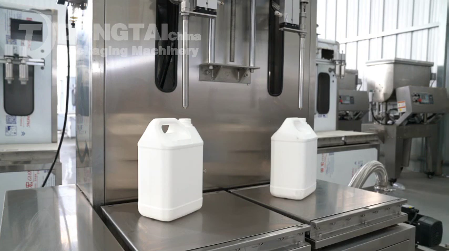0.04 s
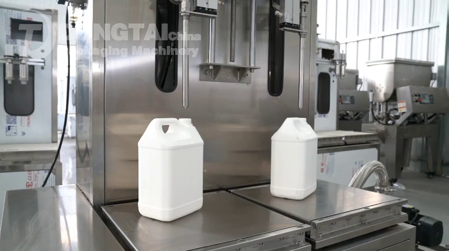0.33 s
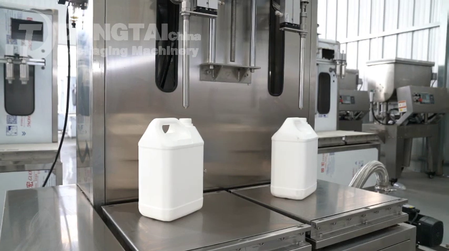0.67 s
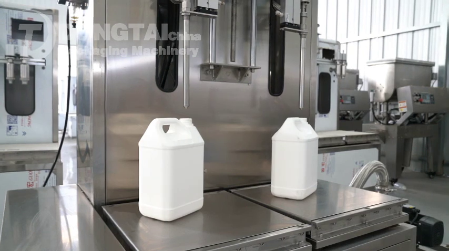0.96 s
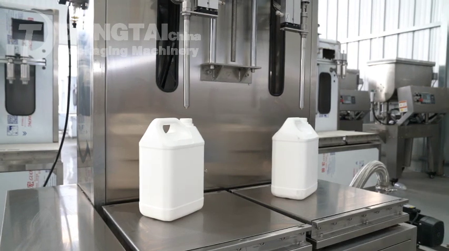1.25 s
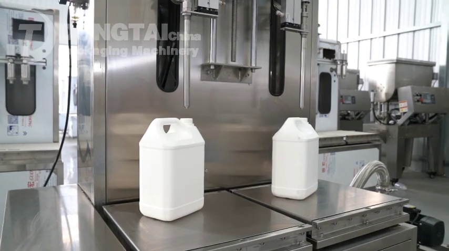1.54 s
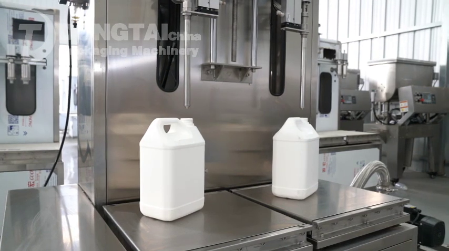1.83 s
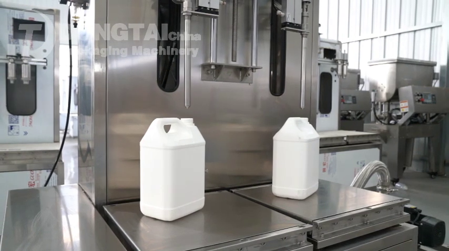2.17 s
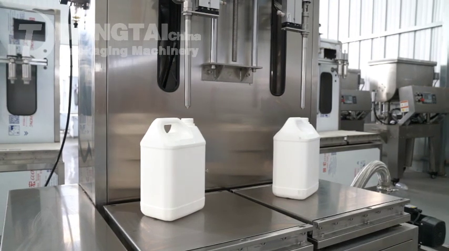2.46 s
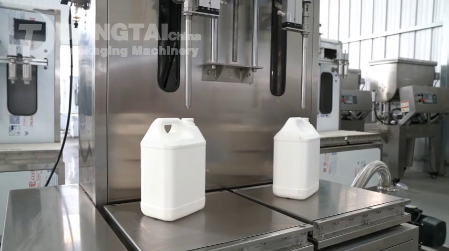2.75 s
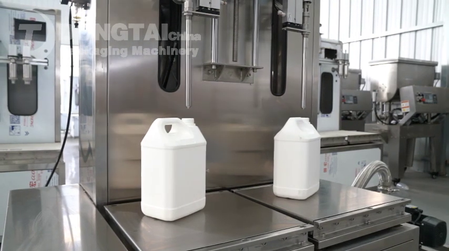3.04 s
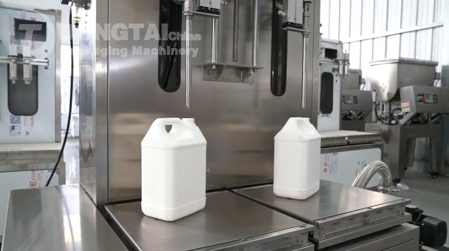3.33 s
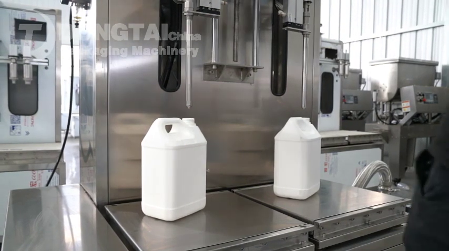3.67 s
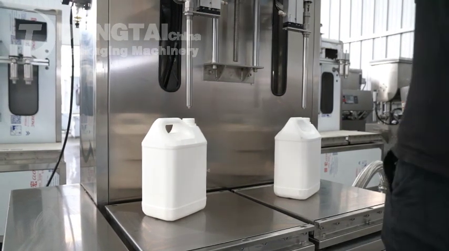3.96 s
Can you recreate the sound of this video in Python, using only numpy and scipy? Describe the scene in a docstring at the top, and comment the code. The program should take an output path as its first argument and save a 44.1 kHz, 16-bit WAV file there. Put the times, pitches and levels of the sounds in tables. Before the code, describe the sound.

Compressed air hisses steadily from a filling machine while motors hum faintly behind it.

```python
"""A steady hiss fades in quickly, a little to the right: compressed air escaping from a filling machine.
The jet rings in narrow resonances and bounces between steel panels, which gives the hiss a fixed,
fine metallic grain. Under it are the rush and rumble of the workshop hall and the hum of motors."""
import sys
import numpy as np
from scipy import signal
from scipy.fft import rfft, irfft, next_fast_len
from scipy.io import wavfile
from scipy.ndimage import uniform_filter1d, map_coordinates

SR = 44100
rng = np.random.default_rng(int(sys.argv[2]) if len(sys.argv) > 2 else 0)


def to_wav(s):
    """Save 16-bit WAV."""
    ch = np.atleast_2d(s).T  # columns
    pcm = np.round(np.clip(ch, -1, 1) * 32767)  # PCM
    wavfile.write(sys.argv[1], SR, pcm.astype(np.int16))


N = 176400  # 4 seconds
TOP_HZ = 15560  # the sound has no treble above this


def air_jet():
    """The escaping air: hiss and ringing together, always wavering a little in loudness."""
    jet = sputter(patchy(hiss() + ringing(), depth_db=0.62))
    build_up_db = -0.5 * np.exp(-np.arange(N) / SR / 0.31)  # the jet starts slightly weaker
    flutter_db = 0.29 * wobble(rate=24.58)
    drift_db = 0.22 * wobble(rate=4.9)
    return jet * amp(build_up_db + flutter_db + drift_db)


# The tone of the hiss on each side. Each row: frequency in Hz, relative level in dB.
HISS_TONE_LEFT = [(150, -31), (500, -12), (1000, -12), (1500, -7), (2150, -6.2), (2450, -2.3), (2800, -0.6),
                  (3400, -0.4), (3900, -1.2), (4600, 1.5), (5350, -2.3), (6000, 4), (6750, -5.5),
                  (7600, 3.3), (8500, -0.5), (10500, -0.9), (13000, 0.3), (14000, -.2), (15400, -2)]
HISS_TONE_RIGHT = [(150, -28), (500, -13.5), (1000, -7.5), (1500, -6), (2150, -3.5), (2450, -2.5),
                   (2800, 2.9), (3400, 0.2), (4400, 2.5), (5350, 3.5), (6000, -2), (6750, 5), (7200, 2),
                   (8300, 5.5), (9200, 3.5), (10100, 3), (11200, 4), (12200, 2.8), (13300, -0.8),
                   (14000, 3.1), (15400, 1)]
# How alike the two sides are. Each row: frequency in Hz, likeness (1 is the same, 0 is unrelated).
HISS_LIKENESS = [(100, .995), (400, 0.87), (900, 0.64), (1900, 0.41), (2450, 0.61), (3600, 0.053),
                 (5200, 0.14), (6300, 0.3), (10000, 0.29), (12800, -0.064), (14200, 0.18)]
def hiss():
    """Swirling air makes noise, which arrives partly off the panels and partly from all around."""
    # The panels' share of the power: they throw back mostly what lies above 1770 Hz.
    share = lambda hz: 0.66 * hz / np.hypot(hz, 1770)
    echoed = filtered(panel_echoes(rng.standard_normal(N)), lambda hz: np.sqrt(share(hz)))
    all_around = filtered(rng.standard_normal((2, N)), lambda hz: np.sqrt(1 - share(hz)))
    noise = spread(echoed + all_around, HISS_LIKENESS)
    tone = lambda hz: amp([along(HISS_TONE_LEFT, hz), along(HISS_TONE_RIGHT, hz)])
    band = lambda hz: hz / np.hypot(hz, 130) * (hz < TOP_HZ)  # the bass falls away below 130 Hz
    shaped = filtered(noise, lambda hz: tone(hz) * band(hz))
    return unit(shaped) * amp([[-18.5], [-16.5]])  # left, right


# The pitches that ring. Each row: pitch in Hz, relative level in dB on the left, then on the right.
RESONANCES = [(2433, -7, -8), (3768, -7, -12), (4097, -8, -7), (5211, -15, -6), (5426, -6, -7),
              (5620, -9, -8), (5889, -8, -9), (6268, -4, -5), (6568, -14, -1), (6625, -7, -3),
              (6797, -6, 1), (7168, -7, -5), (7563, -13, -5), (8105, -18, -2), (8243, -7, -7),
              (8517, -6, -6), (8790, -18, -3), (9045, -17, -4), (9445, -7, -3), (9851, -15, -4),
              (10120, -13, -2), (10184, -13, -2), (10897, -17, -2), (11152, -18, -4), (11196, -10, -2),
              (13330, -18, -2), (13917, -13, -4), (14905, -9, -5)]
def ringing(width_hz=18):
    """The jet keeps the outlet and the steel around it ringing in narrow bands."""
    def gain(hz):
        peak = lambda pitch: np.abs(hz * width_hz / (pitch ** 2 - hz ** 2 + 1j * hz * width_hz))
        power = sum((amp([[left], [right]]) * peak(pitch)) ** 2 for pitch, left, right in RESONANCES)
        return np.sqrt(power)

    return unit(filtered(rng.standard_normal(N), gain)) * amp([[-29.5], [-22.5]])  # left, right


def panel_echoes(sound, decay_s=0.14):
    """Sound bounces between steel panels along two unrelated paths, making dense, short echoes."""
    t = np.arange(SR // 4) / SR
    spectrum = rfft(rng.standard_normal((2, len(t))) * amp(-60 * t / decay_s))
    broad_tone = np.sqrt(uniform_filter1d(np.abs(spectrum) ** 2, size=60, axis=1))
    grain = irfft(spectrum / broad_tone)  # only the fine, metallic peaks and dips remain
    return unit(signal.fftconvolve(sound[None], grain, axes=1)[:, :N])


def sputter(sound, centre_hz=3700, width_hz=2200, depth_db=0.92):
    """Small, brief swells and dips come and go in the body of the hiss."""
    hz, _, bands = signal.stft(sound, SR, nperseg=1024)
    focus = np.exp(-((hz[:, None] - centre_hz) / width_hz) ** 2)
    gain = amp(depth_db * focus * random_patches(bands, bands_wide=5, steps_long=4))
    return signal.istft(bands * gain, nperseg=1024)[1][..., :N]


# The tone of the hall's rush. Each row: frequency in Hz, relative level in dB.
RUSH_TONE = [(60, -22), (145, -10), (195, 1.5), (280, -0.5), (400, 0.5), (510, -0.5), (620, -4.5),
             (800, -3.5), (1000, -2), (1300, -10.5), (3000, -18.5)]
# How alike the two sides are. Each row: frequency in Hz, likeness.
RUSH_LIKENESS = [(80, .9995), (200, 1), (400, 0.96), (1300, 0.81)]
# How loud the rush is over time. Each row: time in seconds, relative level in dB.
RUSH_LEVELS = [(.1, -36.3), (.85, -37.5), (1.7, -37), (1.85, -35.5), (2.15, -40.5), (4, -39)]
def hall_rush(gain_db=-3.5):
    """Machinery fills the hall with a low rush."""
    noise = patchy(rng.standard_normal((2, N)), depth_db=0.5)
    rush = unit(filtered(spread(noise, RUSH_LIKENESS), lambda hz: amp(along(RUSH_TONE, hz))))
    level_db = np.interp(np.arange(N) / SR, *np.transpose(RUSH_LEVELS))
    return rush * amp(level_db + gain_db)


# The tones of the motors. Each row: pitch in Hz, level in dB.
MOTOR_TONES = [(39.5, -66.5), (80, -66), (119, -62), (166, -63), (259, -54.5), (300, -60), (350, -57),
               (521, -54.5), (1067, -54.5), (1233, -52)]
def motor_hum():
    """Motors hum, and the hall blurs each tone into a narrow band, the same on both sides."""
    def tone(pitch):
        width_hz = 2 + 0.002 * pitch
        peak = lambda hz: 1 / (1 + ((hz - pitch) / width_hz) ** 2)
        return unit(filtered(rng.standard_normal(N), peak))

    return sum(amp(level_db) * tone(pitch) for pitch, level_db in MOTOR_TONES)


# The tone of the rumble. Each row: frequency in Hz, relative level in dB.
RUMBLE_TONE = [(20, -20), (35, -12), (60, -11), (82, 1.5), (105, -6), (150, -4.5), (250, -17.5), (600, -40),
               (3000, -80)]
def rumble(level_db=-55.5):
    """The steady bass of the building, the same on both sides."""
    bass = filtered(rng.standard_normal(N), lambda hz: amp(along(RUMBLE_TONE, hz)))
    return unit(bass) * amp(level_db)


def amp(db):
    """Turn decibels into a number to multiply by."""
    return 10 ** (np.asarray(db) / 20)


def unit(x):
    """Bring each channel to an average power of 1."""
    return x / np.sqrt(np.mean(x ** 2, axis=-1, keepdims=True) + 1e-20)


def along(points, hz):
    """Read a table at any frequency, gliding between its rows."""
    row_hz, values = np.transpose(points)
    return np.interp(np.log(hz + 1), np.log(row_hz + 1), values)


def wobble(rate):
    """A smooth curve through `rate` random values a second."""
    return map_coordinates(rng.standard_normal(int(N * rate / SR) + 4), [np.arange(N) * rate / SR])


def filtered(x, response):
    """Turn each frequency up or down by response(hz)."""
    size = next_fast_len(N + SR // 2)
    return irfft(rfft(x, size) * response(np.fft.rfftfreq(size, 1 / SR)), size)[..., :N]


def random_patches(bands, bands_wide, steps_long):
    """Random values, smoothed across frequency and then across time."""
    field = uniform_filter1d(rng.standard_normal(bands.shape[-2:]), size=bands_wide, axis=0)
    field = uniform_filter1d(field, size=steps_long, axis=1)
    return field / field.std()


def patchy(x, depth_db):
    """Let each part of the frequency range slowly swell and dip at random."""
    bands = signal.stft(x, nperseg=512)[2]
    gain = amp(depth_db * random_patches(bands, bands_wide=16, steps_long=18))
    return signal.istft(bands * gain, nperseg=512)[1][..., :N]


def spread(pair, likeness):
    """Mix two unrelated sounds into left and right with the given likeness."""
    angle = lambda hz: np.arccos(np.clip(along(likeness, hz), -1, 1)) / 2
    mid, side = filtered(pair, lambda hz: np.array([np.cos(angle(hz)), np.sin(angle(hz))]))
    return np.array([mid + side, mid - side])


def scene():
    """The air jet over the hall's rush, its rumble and its motors."""
    return air_jet() + hall_rush() + rumble() + motor_hum()


def record(dry, start_s=0.098, fade_s=0.016):
    """The sound fades in quickly, and the highest treble is cut off."""
    fade_in = np.clip((np.arange(N) / SR - start_s) / fade_s, 0, 1) ** 1.85
    return filtered(dry * fade_in, lambda hz: np.clip((TOP_HZ - hz) / 200, 0, 1))


dry = scene()
out = record(dry)
to_wav(out)
```